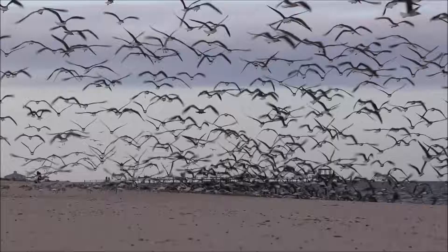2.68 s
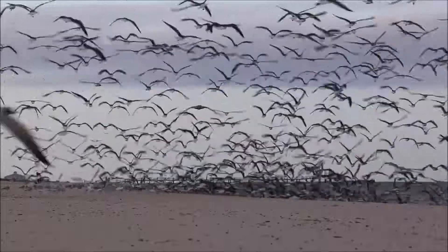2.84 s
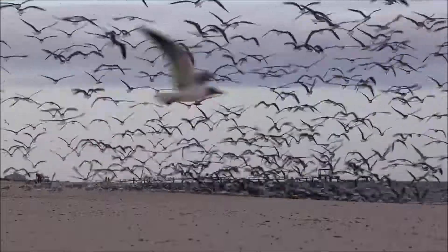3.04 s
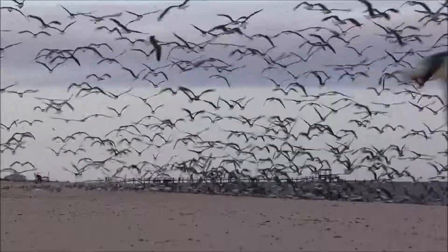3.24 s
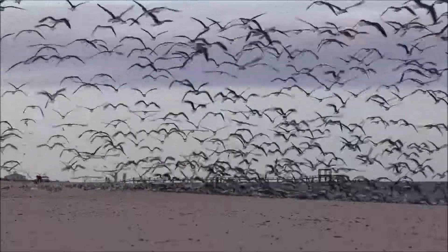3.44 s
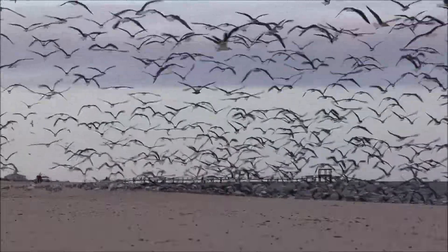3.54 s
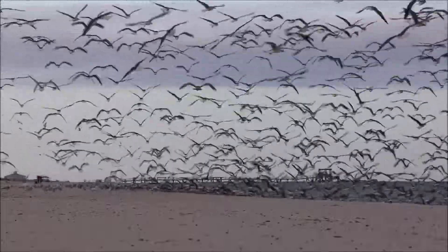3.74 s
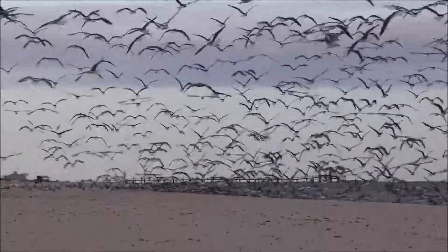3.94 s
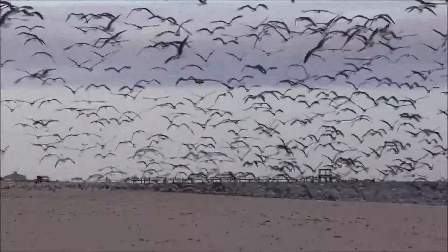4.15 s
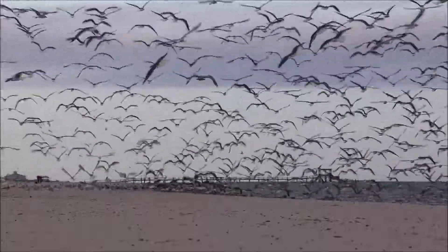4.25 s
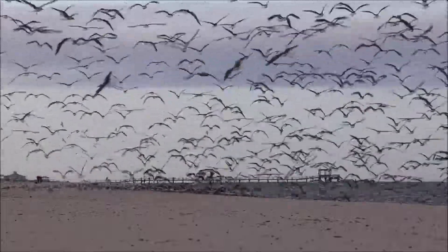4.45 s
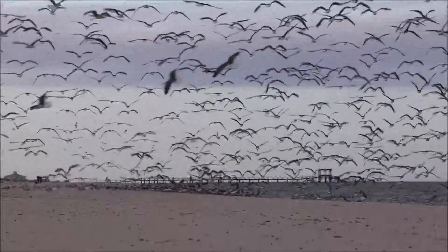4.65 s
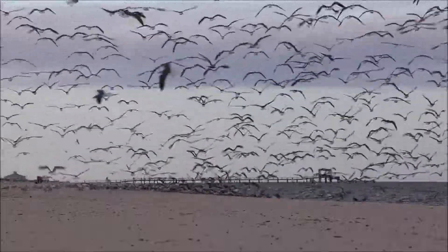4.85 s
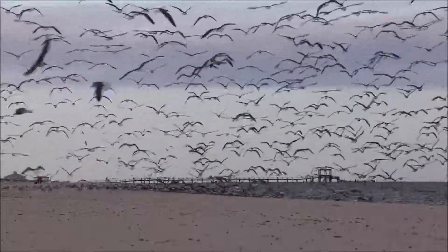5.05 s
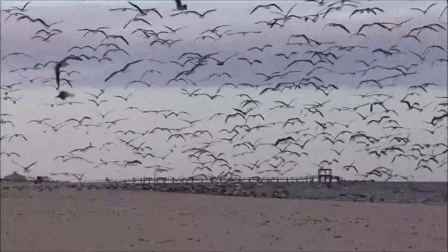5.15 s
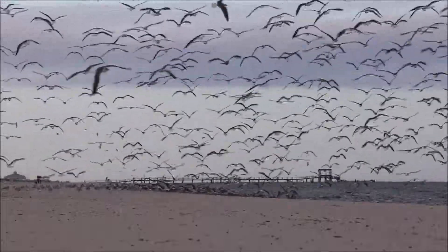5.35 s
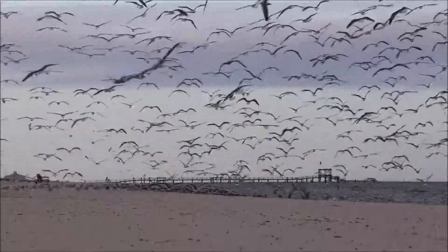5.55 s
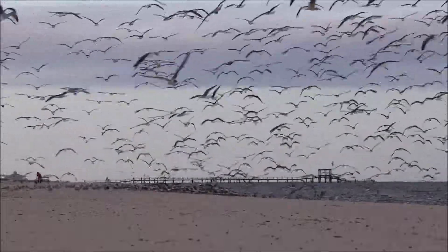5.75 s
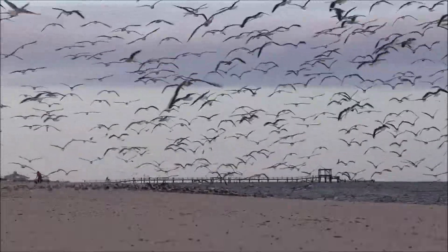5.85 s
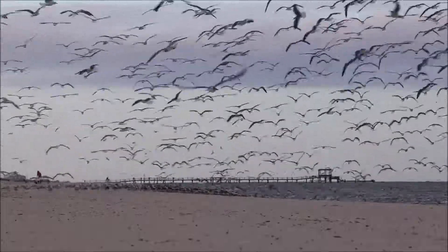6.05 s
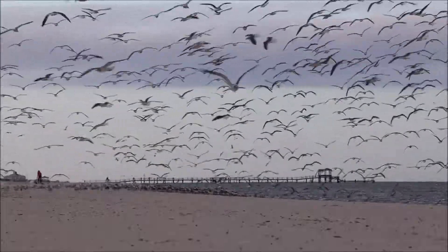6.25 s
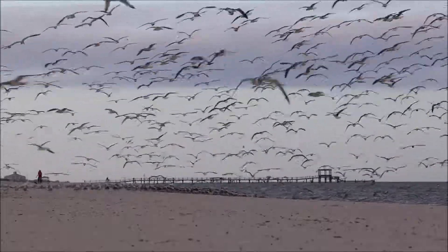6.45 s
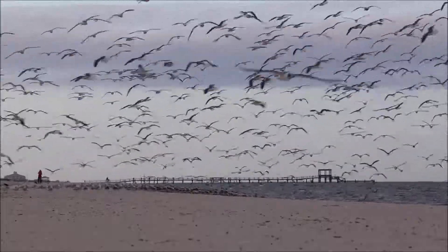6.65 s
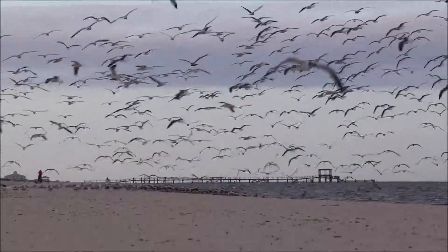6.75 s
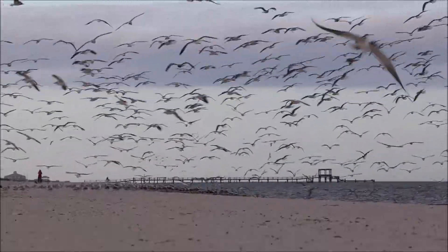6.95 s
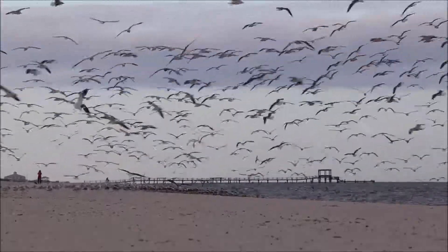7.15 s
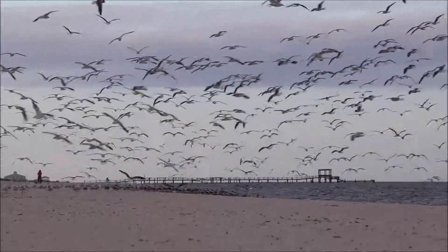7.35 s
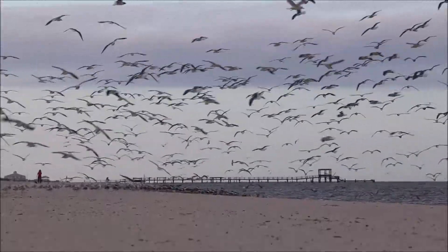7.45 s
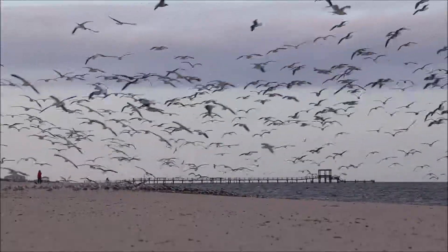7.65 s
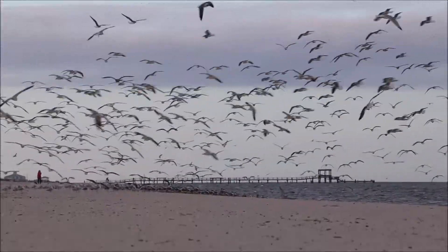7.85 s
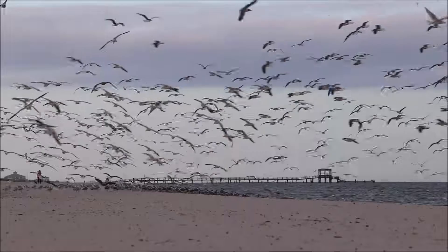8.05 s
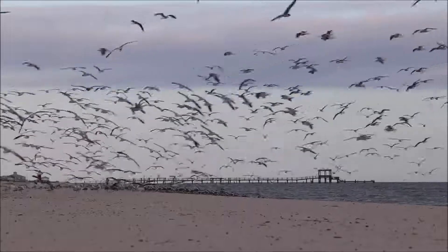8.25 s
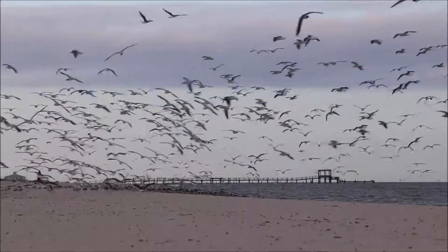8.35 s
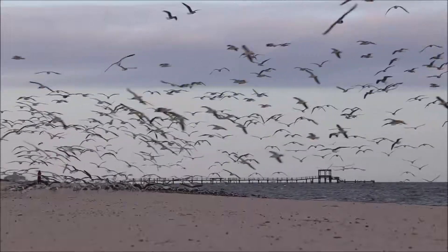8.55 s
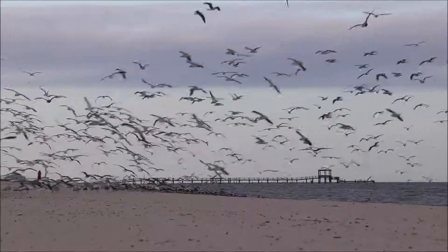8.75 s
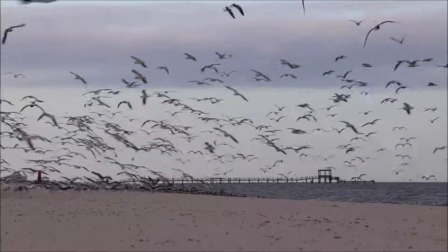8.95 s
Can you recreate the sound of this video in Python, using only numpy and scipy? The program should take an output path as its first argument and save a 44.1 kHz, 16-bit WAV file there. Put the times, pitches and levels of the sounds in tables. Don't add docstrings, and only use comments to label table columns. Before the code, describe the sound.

Low wind buffeting on an outdoor microphone with soft surf hiss, while gulls yelp sparsely at first, then crowd into dense calls and longer wails.

```python
import sys
import numpy as np
from scipy import signal
from scipy.io import wavfile
from scipy.ndimage import uniform_filter1d

SR = 44100
rng = np.random.default_rng(int(sys.argv[2]) if len(sys.argv) > 2 else 0)


def generate_wav(sig):
    pcm = np.round(np.clip(np.atleast_2d(sig).T, -1, 1) * 32767).astype(np.int16)
    wavfile.write(sys.argv[1], SR, pcm)


def invert_db(level):
    return 10 ** (np.asarray(level, dtype=float) / 20)


N = 396900

# [t/s, gust level/dB, small-eddy roar re gust/dB]
GUSTS = [(0, -22.5, -7.5), (0.6, -15.5, -9.5), (1.2, -15, -11), (1.7, -18.5, -8), (2.2, -12, -9.5),
         (2.7, -17, -10.5), (3.7, -19.5, -10), (4.15, -14, -11), (6, -15.5, -8.5), (7, -15.5, -7),
         (8.3, -16, -6), (9, -12, -15)]
# [f/Hz, density/dB per Hz]
WIND_SPECTRUM = [(7.1, -14.5), (12, -6.5), (27, 7), (46, -0.5), (216, -30), (700, -51.5), (910, -131),
                 (1540, -120)]
# [t/s, level/dB]
WAVE_LEVEL = [(0, -45.5), (0.8, -45), (1.05, -42), (1.35, -39), (1.6, -43.5), (2.3, -46), (2.9, -43),
              (3.5, -42), (3.75, -38), (4.0, -40.5), (4.15, -44.5), (9, -45)]
# [f/Hz, density/dB per Hz]
WASH_SPECTRUM = [(150, -3), (250, -0.5), (1270, -11.5), (1750, -13.5), (2540, -22), (8000, -44.5),
                 (10400, -82), (17600, -120)]
# [f/Hz, density/dB per Hz]
SPRAY_SPECTRUM = [(1500, -41.5), (5000, -2.5), (10000, -6.5), (15700, -9.5)]
# [start t/s, length/s, top f/Hz, effort/dB]
SQUAWKS = [
    (.011, .024, 1100, -47),
    (.16, .024, 1000, -57),
    (.245, .04, 1000, -57),
    (.3, .04, 900, -57),
    (6.875, .035, 1050, -49),
]
# [t/s, level/dB]
FLOCK_LEVEL = [(0, -54), (1.6, -55), (2.1, -50), (4.78, -52), (5.25, -38.5), (8.3, -37), (9, -41)]
# [t/s, level/dB]
GRAINS = [
    (0.333, -45),
    (1.0379, -39),
    (1.775, -40),
    (2.3529, -50),
    (3.7538, -46),
    (8.1509, -50),
]
# [f/Hz, gain/dB]
THROAT = [(800, -14), (1150, -13), (1500, 7), (1900, -1.5), (2900, 4.5), (4800, 6), (5800, 2.5),
          (6900, -16.5)]
# [from t/s, to t/s, level/dB]
DOUBLING = [
    (0.52, 0.682, -7.5),
    (4.22, 4.34, -14),
]
# [call start t/s, level/dB]
FACING = [
    (7.193, -19.5),
    (7.825, -21),
    (8.304, -26.5),
]
# [call start t/s, from t/s, gain/dB]
LOW_THROAT = (1.36, 1.46, 17)
# [t/s, treble loss/dB per kHz]
TREBLE_LOSS = [(0, 4.5), (.7, 5.2), (1.35, 7.5), (2, 2), (2.3, 7), (2.7, 5), (3.2, 7), (3.54, 10), (3.8, 5),
               (4.3, 5.5), (4.8, 9), (5.5, 9.5), (5.86, 6), (6.3, 9.5), (7, 10), (7.6, 10), (7.9, 10.5),
               (9, 12.5)]
# [start t/s, top f/Hz, effort/dB]
KEE = [(.432, 928, -33.5), (1.317, 1052, -31), (1.36, 957, -28.5), (2.293, 1005, -36.5),
       (2.664, 1054, -35.5), (2.69, 1022, -37.5), (4.155, 990, -36), (5.035, 900, -41),
       (5.372, 1133, -29.5), (5.39, 1240, -29), (5.545, 1162, -32.5), (7.193, 1066, -26.5),
       (7.825, 1066, -31.5), (8.304, 964, -33.5)]
# [dip t/s, length/s, dip f/Hz, top f/Hz, effort/dB]
OW = [(0.52, 0.14, 800, 955, -36), (1.422, 0.058, 800, 837, -39), (1.44, 0.15, 811, 1066, -38.5),
      (2.379, 0.15, 710, 915, -42.5), (2.742, 0.12, 836, 925, -40), (2.757, .14, 880, 988, -43.5),
      (4.21, 0.13, 804, 933, -38), (5.094, .17, 802, 951, -36.5), (5.438, 0.091, 909, 1038, -31),
      (5.464, 0.11, 889, 947, -33.5), (5.61, .12, 888, 983, -34), (7.256, .13, 756, 809, -37.5),
      (7.887, 0.13, 865, 1016, -32), (8.368, 0.14, 729, 850, -34)]
# [start t/s, length/s, top f/Hz, effort/dB]
KEKS = [(2.065, .04, 1046, -49.5), (3.254, 0.05, 908, -35.5), (3.54, 0.054, 1060, -28.5),
        (3.694, 0.079, 793, -44.5), (5.296, 0.1, 817, -40.5), (6.879, 0.035, 794, -37),
        (6.884, .035, 1050, -37), (3.091, 0.055, 1010, -52), (6.924, 0.03, 844, -40),
        (8.156, 0.053, 1037, -39.5)]
# [start t/s, length/s, top f/Hz, effort/dB]
YIPS = [(0.698, 0.059, 714, -47), (1.696, 0.07, 923, -49.5), (2.458, .05, 1047, -52),
        (3.365, 0.069, 792, -45), (4.031, 0.042, 1173, -40), (4.153, 0.097, 910, -38.5),
        (5.26, 0.064, 1017, -40), (6.606, 0.037, 1142, -36.5), (7.096, .055, 1200, -29),
        (7.357, 0.065, 1130, -31), (7.455, 0.091, 930, -38), (8.144, 0.044, 1116, -43),
        (8.65, .07, 1180, -39)]
# [start t/s, length/s, from f/Hz, top f/Hz, effort/dB]
ARCHES = [(3.634, 0.1, 845, 884, -38.5), (4.555, 0.11, 837, 919, -38), (4.794, 0.15, 841, 935, -37),
          (5.145, 0.067, 960, 1010, -35.5), (5.3, 0.059, 990, 1045, -37.5), (5.8, 0.12, 880, 940, -38),
          (5.86, 0.15, 956, 1067, -39.5), (6.03, 0.097, 922, 1077, -36), (6.136, 0.2, 926, 1037, -35),
          (6.142, .115, 827, 920, -33.5), (8.03, 0.097, 868, 931, -38), (8.4, 0.17, 930, 981, -35),
          (7.277, 0.082, 849, 965, -32.5), (5.47, 0.082, 940, 1073, -36.5)]
# [start t/s, length/s, from f/Hz, top f/Hz, effort/dB]
RAMPS = [(0.119, 0.04, 850, 922, -43.5), (3.75, 0.073, 747, 900, -40.5), (3.944, .1, 772, 940, -40),
         (4.364, 0.086, 835, 959, -34), (4.468, .165, 760, 963, -40), (4.956, 0.16, 794, 1078, -39.5),
         (5.726, .125, 813, 1103, -35.5), (5.972, .12, 794, 953, -37), (6.238, .17, 857, 1029, -33),
         (6.445, .08, 775, 877, -42), (8.213, .1, 878, 963, -31.5), (8.563, .09, 990, 1026, -34.5),
         (5.227, .09, 785, 997, -35.5), (6.776, .1, 830, 1176, -34.5)]
# [start t/s, length/s, from f/Hz, top f/Hz, effort/dB]
WAILS = [(6.519, .35, 913, 973, -31), (6.639, 0.2, 1010, 1020, -36.5), (7.013, 0.36, 858, 962.5, -32),
         (7.539, 0.35, 850, 984, -31.5), (7.567, 0.39, 852, 935, -35.5), (8.32, .23, 916, 942, -36),
         (8.661, .22, 894, 959, -32.5), (8.9, .3, 907, 983, -36)]

OW_SHAPE = dict(top_at=.72, rise=2.7, fall=2.6, last=.9, start_db=-6, end_db=-4)
YIP_SHAPE = dict(top_at=.46, rise=2.0, fall=2.0, last=.84, start_db=-6, end_db=-8)
ARCH_SHAPE = dict(top_at=.62, rise=2.2, fall=2.6, last=.9, start_db=-4, end_db=-6)
RAMP_SHAPE = dict(top_at=.76, rise=1.35, fall=2.0, last=.9, start_db=-7, end_db=-6)
WAIL_SHAPE = dict(top_at=.45, rise=2.2, fall=1.7, last=.945, start_db=-3, end_db=-2.5)
KEE_RISE_S, KEE_HOLD_S, KEE_FROM_SHARE, KEE_START_DB = 0.00876, 0.01226, 0.92, -8
DIP_ROUND_S = .012
KEK_END_SHARE, KEK_END_DB = .86, -7.5
YIP_FROM_SHARE = .86
WAIL_DROP_SHARE, CALL_DROP_SHARE = .04, .25
WAIL_MIN_S = .2
WAVER_SHARE = .008
SAME_CALL_S = .005
SQUAWK_BREATH_DB = -1.5
WHEEL_S = 5.
SPRAY_DB, SPRAY_FOLLOW_SHARE = -48, .4
RECOVERY_DB_PER_S, KNEE_DB = 25., -12.


def evened(x):
    return x / np.sqrt(np.mean(x ** 2) + 1e-20)


def read(points, hz):
    f, value = np.transpose(points)
    return np.interp(np.log(hz + 1), np.log(f + 1), value)


def curve(rows, column):
    rows = np.array(rows)
    return np.interp(np.arange(N) / SR, rows[:, 0], rows[:, column])


def smooth(x, size):
    once = uniform_filter1d(x, size, mode="nearest")
    return uniform_filter1d(once, size, mode="nearest")


def add(mix, s, sound):
    part = mix[round(s * SR):][:len(sound)]
    part += sound[:len(part)]


def noise(spectrum, size, patchy_db, flicker_db):
    frames, hz = 4 * N // size + 5, np.fft.rfftfreq(size, 1 / SR)
    real, imag, patches = rng.standard_normal((frames, len(hz), 3)).T
    patches = uniform_filter1d(patches, size=9, axis=0)
    patches = evened(uniform_filter1d(patches, size=7, axis=1))
    flicker = evened(uniform_filter1d(rng.standard_normal(frames), size=3))
    level_db = read(spectrum, hz)[:, None] + patchy_db * patches + flicker_db * flicker
    z = (real + 1j * imag) * invert_db(level_db)
    return evened(signal.istft(z, nperseg=size, noverlap=3 * size // 4)[1][:N])


def wind():
    lumps = noise(WIND_SPECTRUM, size=4096, patchy_db=0.5, flicker_db=1.68)
    roar = signal.sosfiltfilt(signal.butter(2, 58, "high", fs=SR, output="sos"), lumps)
    buffet = lumps - roar
    return (buffet + evened(roar) * invert_db(curve(GUSTS, 2))) * invert_db(curve(GUSTS, 1))


def surf():
    waves_db = curve(WAVE_LEVEL, 1)
    wash = noise(WASH_SPECTRUM, size=1024, patchy_db=2.22, flicker_db=0.55)
    spray = noise(SPRAY_SPECTRUM, size=1024, patchy_db=-1.5, flicker_db=0.7)
    return wash * invert_db(waves_db + 1.5) + spray * invert_db(SPRAY_FOLLOW_SHARE * waves_db + SPRAY_DB)


def yelp(rows, loss_db, count=14, lead=.01, trail=.028, scoop=0.2, drop=0.2524, wobble=0.0031, breath_db=-22):
    s, hz, db = np.transpose(rows)
    start = s[0]
    s = np.r_[start - lead, s, s[-1] + trail]
    hz = np.r_[hz[0] * (1 - scoop), hz, hz[-1] * (1 - drop)]
    db = np.r_[db[0] - 14, db, db[-1] - 10]
    t = np.arange(s[0], s[-1], 1 / SR)

    def soft(v):
        return smooth(np.interp(t, s, v), size=270)

    shake, flutter, air = rng.standard_normal((len(t), 3)).T
    tremble = wobble * evened(smooth(shake, size=100))
    waver = WAVER_SHARE * evened(smooth(shake[::-1], size=1200))
    pitch = soft(hz) * (1 + tremble + waver)
    turns = np.cumsum(pitch) / SR

    half = 0
    for a, b, g in DOUBLING:
        if s[0] + .03 < a < b < s[-1] + .02:
            half = half + invert_db(g) * np.clip(np.minimum(t - a, b - t) / 0.036, 0, 1)
    multiples = np.arange(1, count + 1, .5 if np.any(half) else 1.)[:, None]
    lines = multiples * pitch
    gain = invert_db(read(THROAT, lines) - loss_db * np.maximum(lines - 2500, 0) / 1000)
    for a, g in FACING:
        if abs(a - start) < SAME_CALL_S:
            gain += invert_db(g - 3 * (lines - 6000) / 1000) * (multiples > 4)
    if abs(LOW_THROAT[0] - start) < SAME_CALL_S:
        gain[0] *= invert_db(LOW_THROAT[2] * np.clip((t - LOW_THROAT[1]) / 0.058, 0, 1))
    gain *= 1 + .3 * np.cos(2 * np.pi * lines * rng.uniform(.0003, .001))
    gain *= np.where(multiples % 1, half, 1)
    phase = 2 * np.pi * (multiples * turns + multiples ** 2 / 7)
    stack = (gain * np.cos(phase)).sum(axis=0)

    catch = 1 + 3 * np.exp(-(t - t[0]) / 0.057)
    rasp = 1 + invert_db(breath_db) * catch * evened(smooth(air, size=30))
    flutter_db = 2.14 * evened(smooth(flutter, size=400))
    effort = invert_db(soft(db) + flutter_db - 1.5)
    return t[0], stack * rasp * effort * signal.windows.tukey(len(t), .1)


def opening(start, top_hz, db):
    top = start + KEE_RISE_S
    return [(start, KEE_FROM_SHARE * top_hz, db + KEE_START_DB),
            (top, top_hz, db),
            (top + KEE_HOLD_S, .985 * top_hz, db + 0.5)]


def kek(start, length, top_hz, db):
    return opening(start, top_hz, db) + [(start + length, KEK_END_SHARE * top_hz, db + KEK_END_DB)]


def arch(start, length, from_hz, top_hz, db, top_at, rise, fall, last, start_db, end_db):
    u = np.linspace(0, 1, 13)
    before = np.maximum(1 - u / top_at, 0) ** rise
    after = (np.maximum(u - top_at, 0) / (1 - top_at)) ** fall
    hz = top_hz - (top_hz - from_hz) * before - (1 - last) * top_hz * after
    return list(zip(start + u * length, hz, db + start_db * before + end_db * after))


def kee_ow(kee, dip, length, dip_hz, top_hz, db):
    into_dip = [(dip - DIP_ROUND_S, dip_hz, db + OW_SHAPE["start_db"])]
    climb = arch(dip + DIP_ROUND_S, length - DIP_ROUND_S, dip_hz, top_hz, db, **OW_SHAPE)
    return opening(*kee) + into_dip + climb


def calls():
    out = [kee_ow(kee, *ow) for kee, ow in zip(KEE, OW)]
    out += [kek(*row) for row in KEKS]
    out += [arch(s, length, YIP_FROM_SHARE * hz, hz, db, **YIP_SHAPE) for s, length, hz, db in YIPS]
    for table, shape in ((ARCHES, ARCH_SHAPE), (RAMPS, RAMP_SHAPE), (WAILS, WAIL_SHAPE)):
        out += [arch(*row, **shape) for row in table]
    return out


def near_gulls():
    out = np.zeros(N)
    wails = [s for s, length, *_ in WAILS if length > WAIL_MIN_S]
    for rows in calls():
        start = rows[0][0]
        loss_db = np.interp(start, *np.transpose(TREBLE_LOSS))
        facing = min(abs(a - start) for a, _ in FACING) < SAME_CALL_S
        drop = WAIL_DROP_SHARE if start in wails else CALL_DROP_SHARE
        add(out, *yelp(rows, loss_db, count=11 if facing else 8, drop=drop))
    for row in SQUAWKS:
        add(out, *yelp(kek(*row), 6.1, count=6, breath_db=SQUAWK_BREATH_DB))
    return out


def far_flock(count=230):
    out = np.zeros(N)
    for k, (jitter, long, high, slope, size) in enumerate(rng.random((count, 5))):
        s = .013 + (k + jitter) * (N / SR - .1) / count
        length, hz = .03 + .07 * long, 840 + 330 * high
        db, breath_db = (5.5 + 5 * size, -5) if s < WHEEL_S else (13 * size ** 2, -17)
        rows = [(s, hz * (.8 + .2 * slope), db - 3),
                (s + .4 * length, hz, db),
                (s + length, hz * (1 - .25 * slope), db - 3)]
        add(out, *yelp(rows, 5.8, count=6, breath_db=breath_db))
    return evened(out) * invert_db(curve(FLOCK_LEVEL, 1))


def beach(x):
    t = np.arange(SR // 4) / SR
    tail = evened(rng.standard_normal(len(t))) * invert_db(-60 * t / 0.032) * (t > .008)
    taps = invert_db(-19) * tail / np.linalg.norm(tail)
    taps[0] = 1
    return signal.oaconvolve(x, taps)[:N]


def sand():
    out, t = np.zeros(N), np.arange(300) / SR
    for s, db in GRAINS:
        crack = smooth(rng.standard_normal(len(t)), size=2) * np.exp(-t / 0.0013)
        add(out, s, invert_db(db + 3.0) * crack / abs(crack).max())
    return out


def scene():
    gulls = beach(near_gulls() + far_flock())
    return (gulls + wind() + surf() + sand())[None]


def top_cut(x):
    return signal.sosfilt(signal.butter(12, 15750, fs=SR, output="sos"), x)


def record(dry):
    power_db = 10 * np.log10(abs(uniform_filter1d(dry[0] ** 2, size=1500)) + 1e-12)
    fall_db = np.arange(N) * RECOVERY_DB_PER_S / SR
    held_db = np.maximum.accumulate(power_db + fall_db) - fall_db
    over_db = np.maximum(held_db - KNEE_DB, 0)
    ducked = dry / invert_db(.2 * uniform_filter1d(over_db, size=800))
    return top_cut(1.121 * np.tanh(ducked / .83))


dry = scene()
out = record(dry)
generate_wav(out)
```